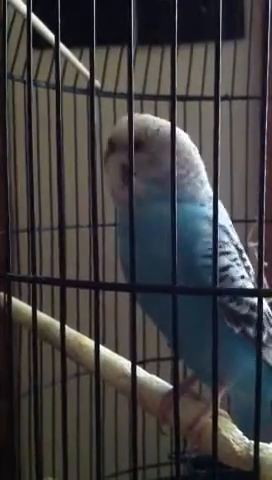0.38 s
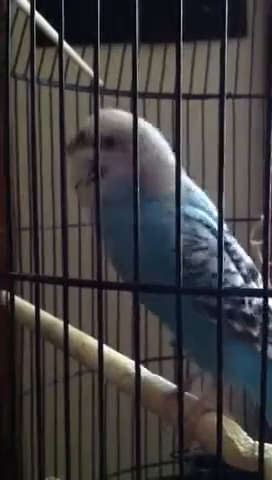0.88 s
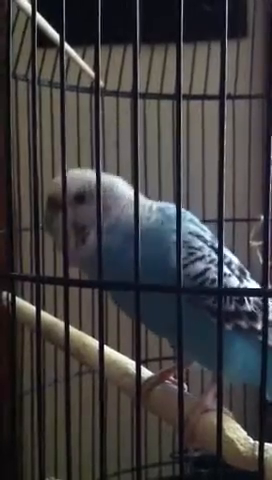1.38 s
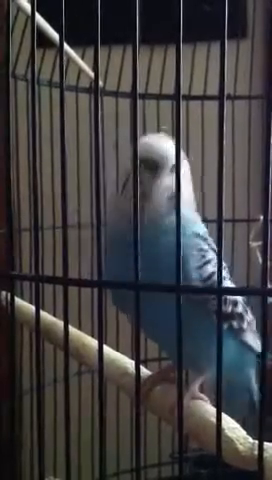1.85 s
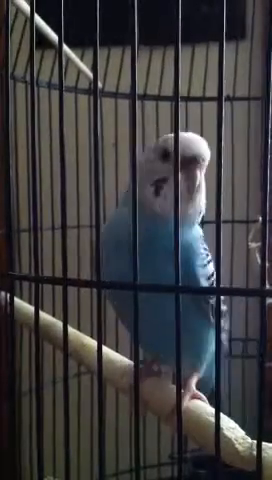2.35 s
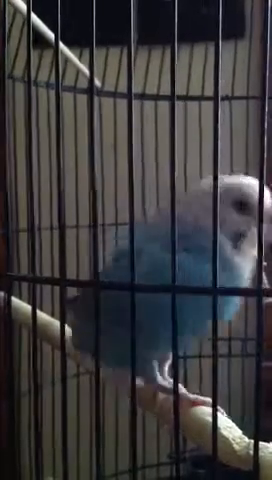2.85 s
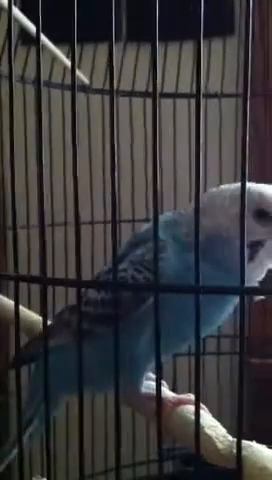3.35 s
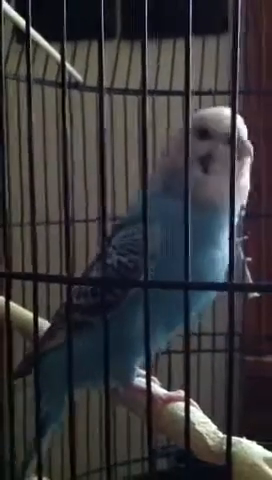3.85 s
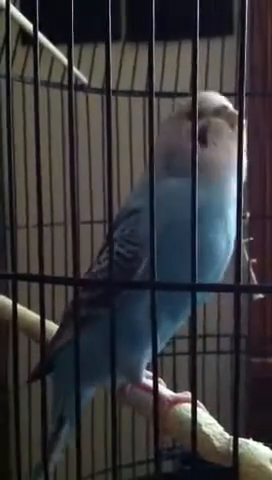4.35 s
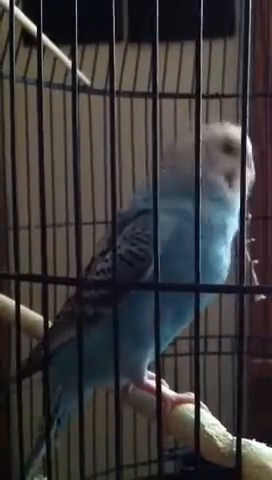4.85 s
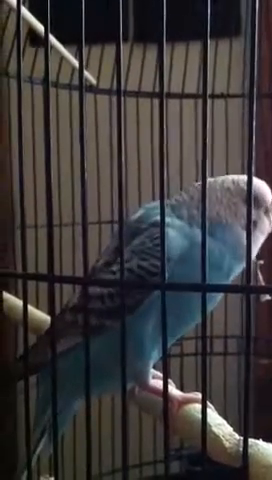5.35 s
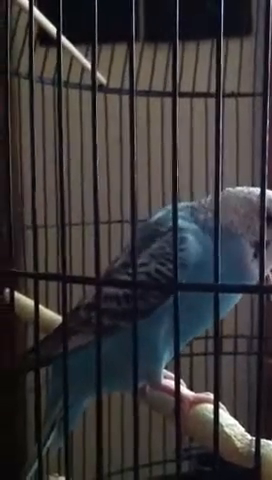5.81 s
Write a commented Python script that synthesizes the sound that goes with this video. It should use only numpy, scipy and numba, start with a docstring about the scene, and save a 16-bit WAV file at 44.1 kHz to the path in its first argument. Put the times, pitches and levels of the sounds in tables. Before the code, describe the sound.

A small parrot vocalizes close to a small microphone in a quiet, hard-walled room, with faint low-heavy hiss and under half a second of reverberation. At 0 s an earlier whistle is dying away; a brief falling chirp and a weak, breathy squawk overlap at 0.1 s. A brighter squawk comes at 0.4 s, then two barks at 0.55 and 0.87 s, each a clean tone gliding up quickly and breaking into throbbing roughness. After a pause, a wavering whistle falls and settles at 1.35-1.5 s. From 1.75 to 3.45 s come ten harsh, bright squawks of about a tenth of a second, initially spaced a quarter second apart, then closer; several rattle, the loudest around 2-2.8 s. Three barks follow at 3.55, 3.9 and 4.3 s, a thin high peep at 4.4 s, and a sharp rising chirp with a higher falling tip at 4.75 s. Then only echo and hiss.

```python
"""A small parrot calls close to the microphone in a quiet, hard-walled room.
Harsh bright squawks ring chaotic membrane slaps through sliding throat resonances, some in rattling bursts.
Low barks start as a clean tone gliding up and break into roughness; short chirps are whistled near sines.
The room answers each call with decaying noise bands, over the tail of an earlier whistle and a faint hiss."""
import sys
import numpy as np
from scipy import signal
from scipy.fft import rfft, irfft, next_fast_len
from scipy.io import wavfile
from scipy.ndimage import uniform_filter1d
from numba import njit

SR = 44100
rng = np.random.default_rng(int(sys.argv[2]) if len(sys.argv) > 2 else 0)


def int16_out(signal):
    """Quantize to a 16-bit WAV file."""
    q = np.round(np.clip(np.atleast_2d(signal).T, -1, 1) * 32767)
    wavfile.write(sys.argv[1], SR, q.astype(np.int16))


def field_ratio(decibels):
    """Amplitude ratio for a level in dB (20 dB per decade); scalars and array-likes work."""
    return 10 ** (np.asarray(decibels, dtype=float) / 20)


N = 262395
TIME = np.arange(N) / SR

# clean start of each bark: onset t/s, settled pitch f/Hz, level/dB, fade of the overtones/(dB per s),
# pitch after the break f/Hz
BARK_STARTS = [(.555, 797, -34.5, 46, 1123), (.866, 986, -31, 488, 1107), (3.556, 870, -35.5, 57.5, 1089),
               (3.885, 901, -32, 29, 1060), (4.32, 884, -31.5, 149.5, 1047)]
# rough part of each bark: voice breaks t/s, length/s, level/dB, middle resonance at the break over that
# level/dB, final pitch of the top resonance f/Hz
BARKS = [(0.592, 0.11, -29, 3, 2600), (0.889, 0.15, -29, -0.5, 2940), (3.585, .12, -31.5, 4, 3330),
         (3.919, .136, -30, 1.5, 3456), (4.347, 0.14, -27.5, -4, 3411)]
# broad spectrum of a bark's rasp and breath: f/Hz, relative level/dB per Hz
BARK_BODY = [(290, -81.5), (500, -44), (1040, -14), (1330, -14.5), (3330, -11), (10400, -32), (15500, -60)]


def rms_one(x):
    """Scale to unit rms."""
    return x / np.sqrt(np.mean(x ** 2) + 1e-20)


def coloured(x, spectrum):
    """Filter by a smooth (f/Hz, level/dB) spectrum; unit power gain for white input."""
    size = next_fast_len(len(x))
    hz, db = np.transpose(spectrum)
    bins_hz = np.arange(size // 2 + 1) * SR / size
    gain = field_ratio(np.interp(np.log(bins_hz + 1), np.log(hz), db))
    return irfft(rfft(x, size) * rms_one(gain), size)[:len(x)]


def wobble(rate_hz):
    """Random motion of spread 1, noise smoothed by two equal one-pole low-passes."""
    r = np.exp(-2 * np.pi * rate_hz / SR)
    return rms_one(signal.lfilter([1], [1, -2 * r, r * r], rng.standard_normal(N)))


def swells(events, rise_s):
    """A quick swell of air pressure at each (t/s, level/dB); it peaks after the rise time and dies away."""
    kicks = np.zeros(N)
    at, db = np.transpose(events)
    kicks[(at * SR).astype(int)] = field_ratio(db)
    r = np.exp(-1 / (rise_s * SR))
    return signal.lfilter([np.e * (1 - r)], [1, -2 * r, r * r], kicks + 1e-18)


def progress(starts, lengths, fade_s):
    """Index of the current call, share of it gone by, and a gate that is open while it sounds."""
    call = np.maximum(np.searchsorted(starts, TIME) - 1, 0)
    since = TIME - starts[call]
    gate = np.clip(np.minimum(since, lengths[call] - since) / fade_s, 0, 1)
    return call, np.clip(since / lengths[call], 0, 1), gate


def contours(tables, fade_s):
    """A gate that is open while a call sounds, and the columns of all calls interpolated over time."""
    gate = 0
    for table in tables:
        first, last = table[0][0], table[-1][0]
        gate = gate + np.interp(TIME, [first, first + fade_s, last - fade_s, last], [0, 1, 1, 0])
    s, *columns = np.transpose(np.concatenate(tables))
    return gate, [np.interp(TIME, s, column) for column in columns]


@njit
def resonance(x, angle, r):
    """Two-pole resonance with moving centre and width; unit power gain for white input."""
    y = np.zeros(len(x))
    for i in range(2, len(x)):
        drive = np.sqrt((1 - r[i] ** 2) / 2) * (x[i] - x[i - 2])
        y[i] = drive + 2 * r[i] * np.cos(angle[i]) * y[i - 1] - r[i] ** 2 * y[i - 2]
    return y


def throat(x, hz, width_hz):
    """One resonance of windpipe and beak."""
    angle = 2 * np.pi * hz / SR * np.ones(N)
    return resonance(x, angle, np.exp(-np.pi * width_hz / SR) * np.ones(N))


def sharp_throat(x, hz, width_hz):
    """A resonance passed twice: steep flanks, about unit power gain."""
    return throat(throat(x, hz, width_hz), hz, width_hz) * np.sqrt(np.pi * width_hz / SR)


def membrane(pitch_hz, jitter, shimmer, breath, count):
    """The voice membranes slap shut once a cycle, uneven in timing and strength, amid air noise."""
    cycles = np.cumsum(pitch_hz * np.exp(jitter * wobble(rate_hz=460))) / SR
    half = np.pi * cycles
    # the first harmonics, all in phase
    slaps = np.sin((2 * count + 1) * half) / (np.sin(half) + 1e-9) - 1
    strength = 1 + shimmer * rng.uniform(-1, 1, 20000)[np.round(cycles).astype(int)]
    voice = rms_one(slaps * strength) * np.sqrt(2 * count * pitch_hz / SR)
    voice = voice + breath * rng.standard_normal(N)
    # steady air pressure evens the power over some 8 ms
    return voice / np.sqrt(uniform_filter1d(voice ** 2, size=351) + 1e-12)


def background_hiss():
    """Faint steady noise, heaviest in the lows."""
    # spectrum: f/Hz, relative level/dB per Hz
    hiss_spectrum = [(15, -68.5), (25, -36.5), (59, -42.5), (79, -19), (281, -2.5), (410, -7), (495, -4.5),
                     (552, -9.5), (598, -5.5), (871, -9.5), (970, -9), (1570, -11), (3170, -18),
                     (15500, -37.5)]
    return field_ratio(-63) * coloured(rng.standard_normal(N), hiss_spectrum)


def room(x):
    """Dense reflections: octave bands of noise, each dying at its own rate, building up over the first ms."""
    # reverberation time: f/Hz, time to fall by 60 dB/s
    decay_times = [(500, 0.37), (1300, 0.38), (3500, 0.45), (9000, 0.31)]
    t, echo = TIME[:SR], 0
    hz, t60 = np.transpose(decay_times)
    for low in 250 * 2. ** np.arange(6):
        octave = signal.butter(2, [low, 2 * low], "band", fs=SR, output="sos")
        band = signal.sosfilt(octave, rng.standard_normal(SR))
        band_t60 = np.interp(np.log(low * np.sqrt(2)), np.log(hz), t60)
        echo = echo + band * field_ratio(-60 * t / band_t60)
    echo = echo * np.clip(t / 0.0092, 0, 1)
    return signal.fftconvolve(x, echo / np.sqrt(np.sum(echo ** 2)))[:N]


def earlier_chirp():
    """An earlier whistle still dies away in the room: narrow noise falling by 120 dB per s."""
    ringing = throat(throat(rng.standard_normal(N), 2800, 150), 2800, 150)
    return field_ratio(-55.5 - 120 * TIME) * rms_one(ringing)


def chirps():
    """Whistles: a near sine with faint overtones, throbbing 73.5 times a second, the long one deepest."""
    # contour of each chirp: t/s, pitch f/Hz, level/dB
    whistles = [
        [(.073, 3493, -48), (.08, 3214, -39), (.092, 3610, -34), (.095, 3065, -44), (.102, 2746, -43),
         (.112, 2300, -43)],
        [(1.354, 4670, -62.5), (1.372, 4370, -50), (1.381, 3420, -51), (1.393, 3956, -43), (1.402, 2990, -44),
         (1.41, 3264, -36.5), (1.43, 2833, -42), (1.439, 2956, -36), (1.447, 2494, -36.5), (1.456, 2873, -38),
         (1.478, 2700, -34.5), (1.5, 2775, -38), (1.52, 2755, -40.5)],
        [(4.41, 6140, -58), (4.42, 6330, -53), (4.44, 5910, -43), (4.456, 5850, -47)],
        [(4.733, 4630, -49), (4.745, 4486, -43), (4.753, 4093, -53.5), (4.761, 3156, -43.5), (4.772, 3820, -45),
         (4.781, 2980, -33), (4.786, 3120, -46), (4.792, 3257, -24.5), (4.798, 3456, -33), (4.802, 3574, -32)],
        [(4.803, 5340, -44), (4.806, 5230, -48), (4.811, 4340, -38.5), (4.818, 4360, -41), (4.823, 4350, -44)],
    ]
    # overtones: multiple of the pitch, level/dB
    whistle_overtones = [(2, -30.5), (3, -25.5), (4, -39), (5, -39)]
    # unsteadiness of pitch of each chirp [share]
    unsteadiness = [.05, .006, .02, .006, .006]
    gate, (pitch_hz, db) = contours(whistles, fade_s=0.0014)
    later_starts = [table[0][0] for table in whistles[1:]]
    hoarse = np.array(unsteadiness)[np.searchsorted(later_starts, TIME)]
    phase = 2 * np.pi * np.cumsum(pitch_hz * np.exp(hoarse * wobble(rate_hz=150))) / SR
    overtones = sum(field_ratio(level_db) * np.sin(k * phase) for k, level_db in whistle_overtones)
    tone = np.sin(phase) + field_ratio(4 * wobble(rate_hz=200)) * overtones      # the overtones flicker
    depth_db = np.interp(TIME, [1.39, 1.44, 1.49, 1.5], [1.7, 8.3, 4, 3.2])
    throb_db = depth_db * np.cos(2 * np.pi * 73.5 * (TIME - 1.4005))
    level = field_ratio(db + throb_db + 1.6 * wobble(rate_hz=47))
    return np.sqrt(2) * gate * level * tone


def bark_starts():
    """A slightly hoarse, breathy stack of harmonics glides up; after the break its overtones linger in the rasp."""
    # clean tone: multiple of the pitch, level/dB, time constant of its decay after the break/s
    harmonics = [(1, 4, 0.0011), (2, 4, 0.057), (3, 0.5, 0.028), (4, -12.5, .004), (6, -20, .004)]
    first_hz, glide_hz_per_s = 594.7, 32350      # every bark starts here and at first climbs at this rate
    out, unsteady, hoarse = np.zeros(N), wobble(rate_hz=190), wobble(rate_hz=170)
    breath = coloured(rng.standard_normal(N), BARK_BODY)
    for (onset, settled_hz, db, fade_db, _), (broken, *_) in zip(BARK_STARTS, BARKS):
        i, since = round(onset * SR), TIME[:SR // 6]
        span = slice(i, i + len(since))
        after = np.maximum(since - broken + onset, 0)
        to_go = np.exp(-since * glide_hz_per_s / (settled_hz - first_hz))
        pitch_hz = settled_hz + (first_hz - settled_hz) * to_go
        phase = 2 * np.pi * np.cumsum(pitch_hz * np.exp(.02 * unsteady[span])) / SR
        stack = 0
        for k, level_db, linger_s in harmonics:
            level = field_ratio(level_db - fade_db * since * (k > 1)) * np.exp(-after / linger_s)
            stack = stack + level * np.sin(k * phase + k * k)
        voice = (1 + 0.13 * hoarse[span]) * stack + field_ratio(-13.5) * np.exp(-after / .004) * breath[span]
        out[span] += field_ratio(db) * (1 - np.exp(-since / 0.0076)) * voice
    return signal.sosfilt(signal.butter(2, 450, "high", fs=SR, output="sos"), out)


def barks():
    """After the break the voice jumps up and throbs; its scattered slaps ring three throat resonances."""
    # strongest throbs of the lowest resonance: t/s, level/dB
    strong_throbs = [(.597, -50), (.656, -34), (.669, -37), (.896, -39), (.922, -55), (.942, -33),
                     (.957, -43), (.979, -48), (1.001, -42), (3.636, -27), (3.656, -37), (3.959, -27),
                     (4.008, -35.5), (4.381, -33), (4.406, -35.5)]
    tires_db, tires_from = 13, 0.21      # the lowest resonance sags from this share of the length on
    stutter_hz, stutter_wavers, stutter_db = 56, .25, 4.5      # it comes in uneven gulps
    mid_start_hz, mid_arch_hz, mid_fall_db = 1632, 148, 17      # the middle one arches in pitch and fades
    # the top one climbs over a share of the length and grows
    top_start_hz, top_climb_share, top_db, top_grows_db = 2600, 0.68, -14, 5.5
    breaks, lengths, db, mid_db, last_hz = np.transpose(BARKS)
    call, share, gate = progress(breaks, lengths, fade_s=0.0039)
    pitch_hz = np.array(BARK_STARTS)[call, -1] * np.exp(.04 * wobble(rate_hz=40))
    slaps = membrane(pitch_hz, jitter=.1, shimmer=.8, breath=.45, count=11)
    source = gate * field_ratio(db[call]) * slaps
    mid_flutter, top_flutter = [field_ratio(3.0 * wobble(rate_hz=60)) for _ in range(2)]

    throbs = swells(strong_throbs, rise_s=0.0043) * slaps
    tiring = field_ratio(-3.5 - tires_db * np.maximum(share - tires_from, 0) / (1 - tires_from))
    gulp_hz = stutter_hz * np.exp(stutter_wavers * wobble(rate_hz=20))
    gulps = field_ratio(stutter_db * np.cos(2 * np.pi * np.cumsum(gulp_hz) / SR))
    low = sharp_throat(gulps * tiring * source + throbs, pitch_hz, 450)

    mid_hz = mid_start_hz + mid_arch_hz * np.sin(np.pi * share)
    mid_gain = field_ratio(mid_db[call] - mid_fall_db * share)
    mid = sharp_throat(mid_flutter * mid_gain * source, mid_hz, 280)

    top_hz = top_start_hz + (last_hz[call] - top_start_hz) * np.minimum(share / top_climb_share, 1)
    top = sharp_throat(top_flutter * field_ratio(top_db + top_grows_db * share) * source, top_hz, 660)

    # a broad rasp swells to its peak about halfway
    rasp_gain = field_ratio(-8.5 - 9.5 * np.abs(share - 0.52))
    rasp = coloured(rasp_gain * np.sqrt(top_flutter) * source, BARK_BODY)
    # the small body radiates few lows
    return signal.sosfilt(signal.butter(3, 650, "high", fs=SR, output="sos"), low - mid + top + rasp)


def rattle_bursts():
    """(t/s, level/dB) of every burst: near-even spacing, levels ramped through each run and scattered."""
    # runs of bursts where a squawk rattles: first t/s, last t/s, spacing/s, first level/dB, last level/dB
    rattles = [(1.7473, 1.774, .0069, -21.5, -8.5), (1.7872, 1.8004, .0065, -6.5, -15),
               (2.0156, 2.0574, .0071, -17, -0.5), (2.2406, 2.2521, .0123, -18, -9),
               (2.2598, 2.2988, .0077, -1.5, -6), (2.594, 2.595, .0073, -6.5, -4.5)]
    rows = []
    for first, last, spacing, first_db, last_db in rattles:
        for s in np.linspace(first, last, round((last - first) / spacing) + 1):
            rows.append((s, np.interp(s, [first, last + 1e-6], [first_db, last_db])))
    return np.array(rows) + rng.normal(0, 1, (len(rows), 2)) * [.0005, 3]      # spread in s, in dB


def squawks():
    """Chaotic slaps, throbbing fast and evenly, ring two broad resonances that slide with every throb."""
    # squawks: start t/s, length/s, level/dB, throat resonance at the start f/Hz, once the beak is open f/Hz
    squawk_calls = [(0.081, 0.15, -36, 2800, 2450), (0.371, 0.11, -28.5, 1600, 3100),
                    (1.744, 0.1, -30, 3300, 2900), (2.001, 0.1, -23.5, 2250, 3140),
                    (2.232, 0.091, -21.5, 2600, 2900), (2.427, 0.066, -25.5, 2850, 3350),
                    (2.548, 0.098, -23, 1474, 4300), (2.723, .1, -24, 2240, 3945),
                    (2.88, 0.098, -27.5, 2750, 3100), (2.993, 0.12, -31, 2450, 2800),
                    (3.171, 0.13, -26.5, 2450, 2950), (3.354, 0.1, -28.5, 3000, 2900)]
    # breadth of a squawk around its resonances: f/Hz, relative level/dB per Hz
    squawk_body = [(400, -32), (1000, -6.5), (1600, 5), (2400, 1.5), (4200, -18.5), (7000, -1), (9000, -16),
                   (11500, -25), (15500, -58.5)]
    # tone colour of each squawk: t/s, treble level before the dulling at low throat pitch/dB,
    # upper resonance at mid-call f/Hz, width of the resonances as a share of their pitch, lows fade under f/Hz
    tone_colour = [(.15, 12.5, 5150, 0.54, 400), (.45, 7, 5490, 0.38, 550), (1.8, 7, 4920, 0.38, 350),
                   (2.052, 8, 5840, 0.39, 1400), (2.3, 9.5, 5200, 0.54, 930), (2.47, 1, 5200, 0.39, 1040),
                   (2.6, -7, 6460, 0.43, 820), (2.78, -14.5, 7250, 0.27, 980), (2.93, 3, 5400, 0.27, 1570),
                   (3.07, 7.5, 5260, 0.39, 1710), (3.25, 6, 5450, 0.33, 1650),
                   (3.401, 7.5, 5550, 0.37, 1670)]
    # a squawk swells over a share of its length and sags at the end
    swell_db, swell_share, sag_db, sag_from = 17.5, 0.6, 10.5, 0.79
    open_share = 0.91      # share of the length over which the beak opens
    # under this throat pitch the beak is nearly shut: treble is lost, the upper resonance drops Hz per Hz
    shut_below_hz, shut_db_per_khz, shut_pull = 2480, 25, 4.5
    throb_hz, throb_wavers, throb_depth_db = 188, .06, 2.5
    starts, lengths, level_db, first_hz, open_hz = np.transpose(squawk_calls)
    call, share, gate = progress(starts, lengths, fade_s=.004)
    swell = np.maximum(1 - share / swell_share, 0) ** 2.1
    sag = (np.maximum(share - sag_from, 0) / (1 - sag_from)) ** 2
    effort_db = -swell_db * swell - sag_db * sag

    colour_s, treble_db, upper_hz, width, cut_hz = np.transpose(tone_colour)
    width = np.interp(TIME, colour_s, width)
    opening = np.sin(np.pi / 2 * np.minimum(share / open_share, 1)) ** 2
    low_hz = first_hz[call] + (open_hz - first_hz)[call] * opening
    shut_hz = np.maximum(shut_below_hz - low_hz, 0)
    treble_db = np.interp(TIME, colour_s, treble_db) - shut_db_per_khz * shut_hz / 1000
    # the upper resonance climbs 400 Hz through the call
    high_hz = np.interp(TIME, colour_s, upper_hz) + 400 * (share - .5) - shut_pull * shut_hz
    # effort brightens the voice: dB of upper resonance and of hiss gained per dB
    high_db = treble_db + 0.75 * effort_db
    hiss_db = -8.5 + 0.64 * treble_db + 0.9 * effort_db

    turns = 2 * np.pi * np.cumsum(throb_hz * np.exp(throb_wavers * wobble(rate_hz=30))) / SR
    throb = field_ratio(throb_depth_db * np.cos(turns - 1))
    slide = np.sin(turns) + np.sin(2 * turns) / 3      # quick rise, slower fall
    low_hz, high_hz = low_hz + 430 * slide, high_hz + 300 * slide

    rattle = rattle_bursts()
    rattling = np.clip(swells([(s - .006, 0) for s, _ in rattle], rise_s=.005), 0, 1)
    # the steady voice drops by up to 8 dB amid the bursts
    steady = gate * field_ratio(level_db[call] + effort_db - 8 * rattling) * throb
    bursts = field_ratio(-14.5 - np.maximum(high_db, 0)) * swells(rattle, rise_s=0.0012)
    slaps = membrane(1500, jitter=0.27, shimmer=0.17, breath=0.81, count=8)
    source = (steady + bursts) * slaps

    low = sharp_throat(source, low_hz, width * low_hz)
    high = sharp_throat(field_ratio(high_db) * source, high_hz, width * high_hz)
    # a rough low body under the throat resonances fades through the call
    chest = throat(field_ratio(-7 - 12.5 * share) * source, 1514, 740)
    voice = low - high - chest + coloured(field_ratio(hiss_db) * source, squawk_body)
    for start in starts:      # a short windpipe radiates few lows
        i = round(start * SR)
        span = slice(i, i + SR // 7)
        edge_hz = np.interp(start + .05, colour_s, cut_hz)
        voice[span] = signal.sosfilt(signal.butter(3, edge_hz, "high", fs=SR, output="sos"), voice[span])
    return voice


def scene():
    """The bird, its room and the background hiss."""
    bird = squawks() + bark_starts() + barks() + chirps()
    reflections = field_ratio(-11) * room(bird)
    return (bird + reflections + earlier_chirp() + background_hiss())[None]


def roll_off(x):
    """The treble ends steeply here."""
    return signal.sosfilt(signal.butter(12, 15940, fs=SR, output="sos"), x)


def record(dry):
    """A small microphone whose top is cut above 14.5 kHz."""
    cut = signal.sosfilt(signal.butter(8, 14500, fs=SR, output="sos"), dry)
    return roll_off(cut)


dry = scene()
out = record(dry)
int16_out(out)
```